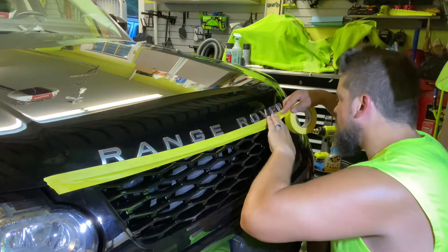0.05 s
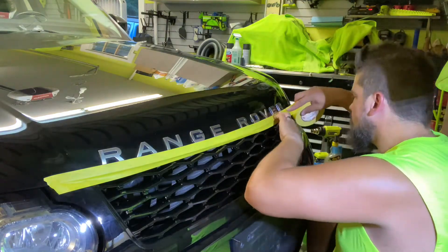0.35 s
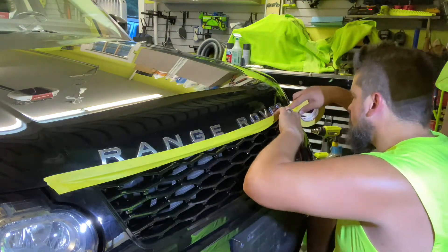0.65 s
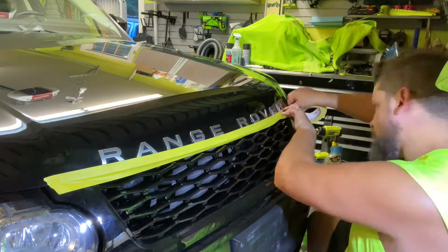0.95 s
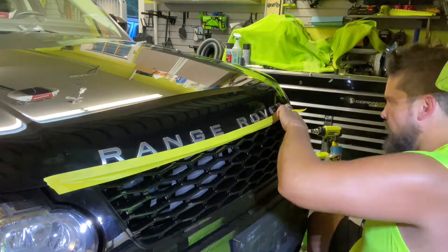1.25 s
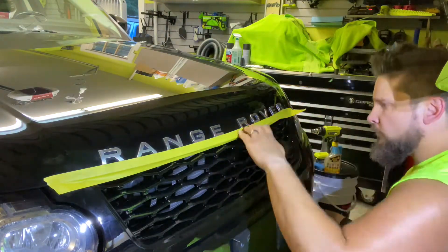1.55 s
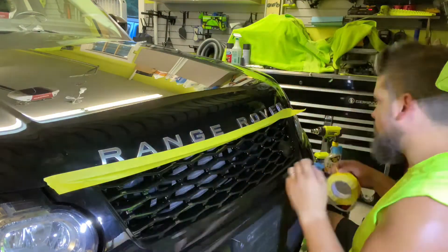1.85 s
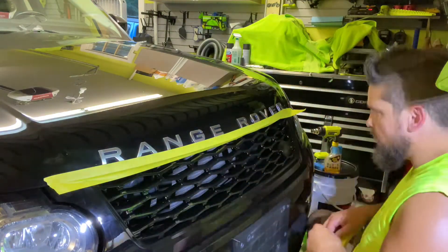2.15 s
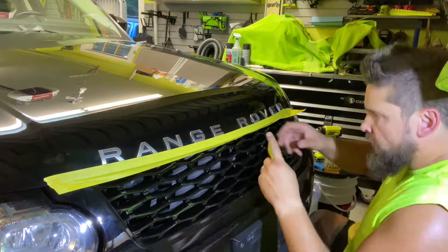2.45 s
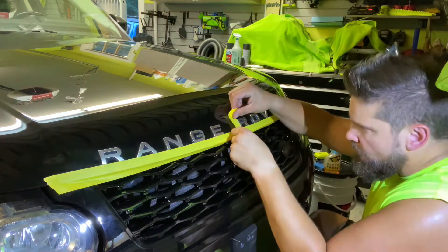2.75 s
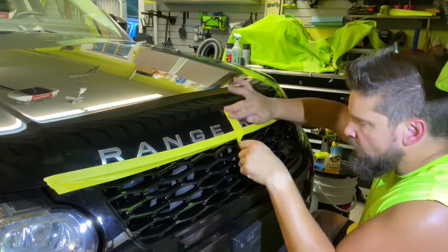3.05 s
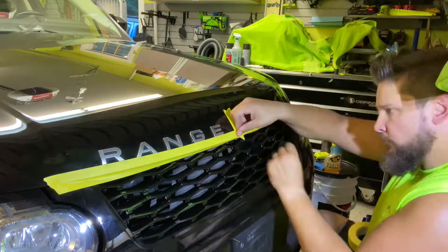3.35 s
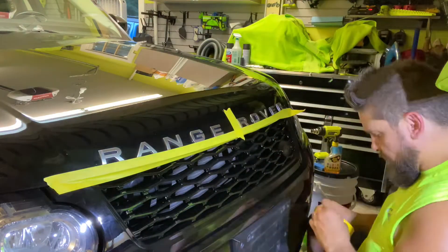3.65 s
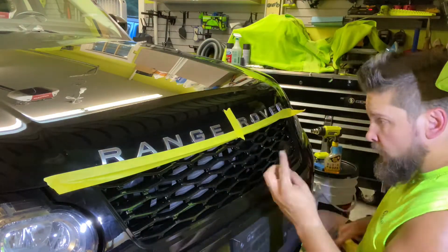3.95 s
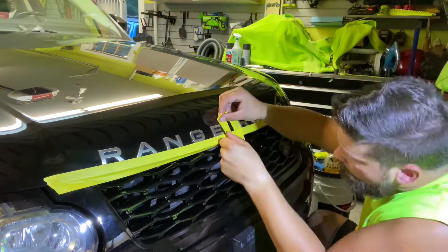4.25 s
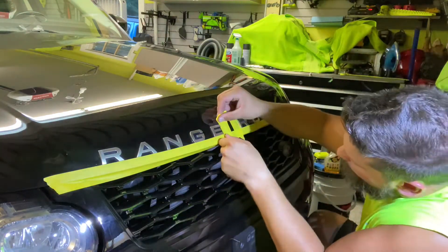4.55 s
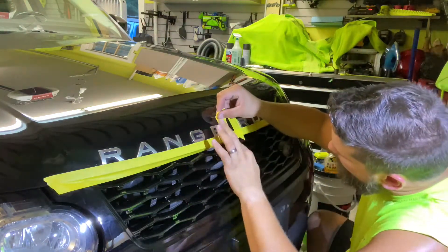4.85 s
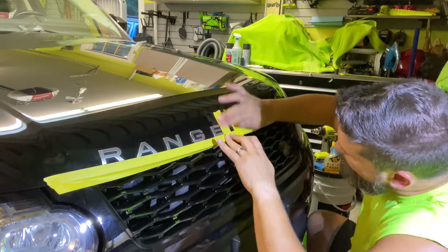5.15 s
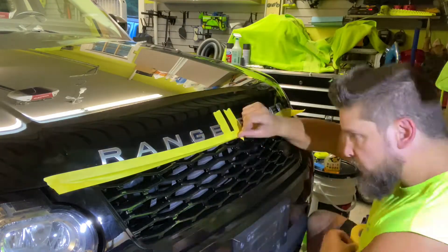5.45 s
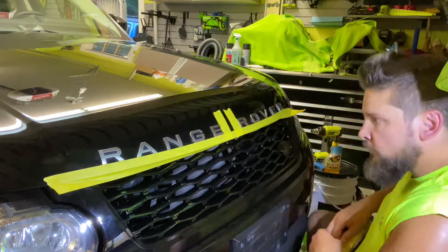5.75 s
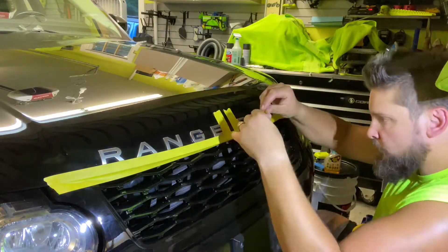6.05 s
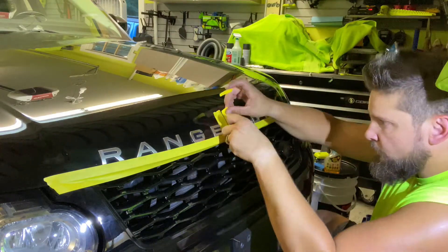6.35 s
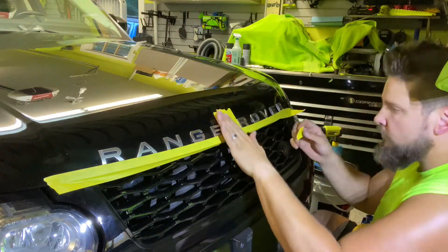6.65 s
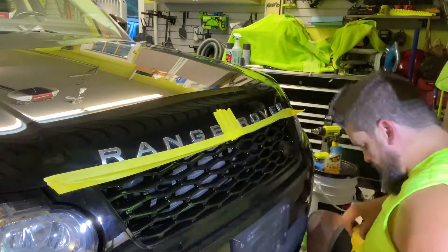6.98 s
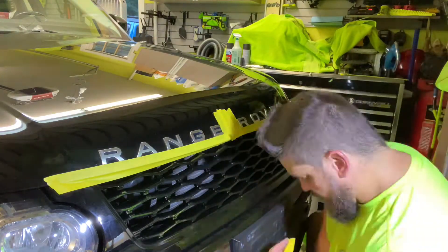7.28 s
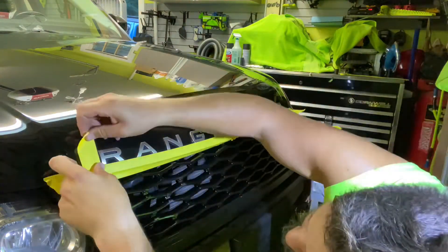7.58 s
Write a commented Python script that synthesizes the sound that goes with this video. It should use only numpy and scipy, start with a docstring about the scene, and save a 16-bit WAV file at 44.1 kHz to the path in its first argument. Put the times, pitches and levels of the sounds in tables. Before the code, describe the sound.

Masking tape crackles, squeaks and snaps as it is peeled, torn and pressed onto a car bonnet, over a faint fan hum.

```python
"""Masking tape is peeled off its roll, torn into short strips and pressed onto a car's painted bonnet.
Stick-slip friction drives it: the glue loads and lets go in crackling slips or, when the cycle is
nearly periodic, in short squeals. Fingers pat, rub and squeak on the strips.
The bonnet and the garage's shelves throw back quick echoes, over the steady hum and air of a fan."""
import sys
import numpy as np
from scipy import signal
from scipy.fft import rfft, irfft, next_fast_len
from scipy.io import wavfile

SR = 44100
rng = np.random.default_rng(int(sys.argv[2]) if len(sys.argv) > 2 else 0)


def master_out(mix):
    """Clip the mix to full scale and print it as 16-bit PCM to the path in sys.argv[1]."""
    frames = np.transpose(np.atleast_2d(mix))
    ceiling = np.clip(frames, -1, 1)
    pcm = np.round(ceiling * 32767).astype(np.int16)
    wavfile.write(sys.argv[1], SR, pcm)


N = 336042
TIME = np.arange(N) / SR
FILTER_HZ = np.fft.rfftfreq(2048, 1 / SR)
BAND_LIMIT_HZ = 15800


def gain_of(db):
    """Amplitude ratio of a level in decibels."""
    return 10 ** (np.asarray(db) / 20)


def unit_rms(x):
    """Normalisation to rms 1."""
    return x / np.sqrt(np.mean(x ** 2) + 1e-20)


def curve(points, hz):
    """Interpolation along a log-frequency axis."""
    f, value = np.transpose(points)
    return np.interp(np.log(hz + 1), np.log(f + 1), value)


def bells(peaks, hz):
    """Response in dB of a set of bell-shaped peaks and dips."""
    return sum(db * np.exp(-(2 * (hz - f) / width) ** 2) for f, width, db in peaks)


def add(mix, start_s, sound, pan_db=0):
    """Superposition in stereo; pan_db is the level difference, left minus right."""
    part = mix[:, max(round(start_s * SR), 0):][:, :len(sound)]
    part += gain_of([[pan_db / 2], [-pan_db / 2]]) * sound[:part.shape[1]]


def wander(count, hz):
    """Random modulation: noise of rms about 1, low-passed at hz."""
    size = next_fast_len(count + 4096)
    lowpass = np.exp(-(np.fft.rfftfreq(size, 1 / SR) / hz) ** 2)
    return unit_rms(irfft(rfft(rng.standard_normal(size)) * lowpass, size))[:count]


def colour(x, db):
    """Minimum-phase filter with gain db on FILTER_HZ: clicks keep their sharp front."""
    log_gain = np.log(gain_of(np.r_[db, db[-2:0:-1]]))
    taps = np.fft.ifft(np.exp(np.conj(signal.hilbert(log_gain)))).real
    return signal.fftconvolve(x, taps[:len(db)])


# Likeness of left and right: frequency_hz, correlation
STEREO_CORRELATION = [(40, 0.52), (150, 0.53), (300, 0.97), (1000, 0.83774), (2500, 0.55), (5000, 0.29),
                      (8500, -0.24), (16000, 0.3)]
def microphone_pair(pair):
    """Partial coherence: two independent signals become alike in the bass, less so in the treble."""
    size = pair.shape[1]
    a, b = rfft(pair)
    correlation = curve(STEREO_CORRELATION, np.fft.rfftfreq(size, 1 / SR))
    mid, side = a * np.sqrt((1 + correlation) / 2), b * np.sqrt((1 - correlation) / 2)
    return irfft(np.array([mid + side, mid - side]), size)


# Spectrum of the fan's air: frequency_hz, gain_db
AIR_SPECTRUM = [(35, -54), (100, -46), (170, -43), (290, -23), (410, -19), (470, -8.5), (517, 0),
                (630, -9.5), (1050, -7.5), (1350, -16.5), (2500, -16), (3700, -17.5), (4300, -20),
                (9000, -21), (16000, -28.5)]
# Resonances in that air: centre_hz, width_hz, gain_db
AIR_RESONANCES = [(815, 88, 0.5), (1466.6, 38, 9), (1922.9, 130, 8), (2180, 150, 4.5), (2440, 130, 3.5),
                  (3064, 90, 8), (3220, 120, 4), (3603, 170, 6.5), (3780, 90, 1), (4590, 110, 4.5),
                  (5830, 170, 7), (6670, 220, 4.5), (15000, 650, 7.5)]
# Hum, blade tone first (its level follows BLADE_SWELL instead): pitch_hz, level_db
HUM_TONES = [(516.8, -61), (1034, -67), (1098, -71.5), (1200, -77)]
# Swell of the blade tone: time_s, level_db
BLADE_SWELL = [(0, -62), (.5, -66), (.85, -60), (1.6, -60.5), (2.2, -55.5), (3.2, -58), (3.9, -63.5),
               (4.35, -59), (4.8, -65), (5.6, -54), (6.4, -64), (7.62, -56)]
def fan(air_db=-55.5, flutter_db=1.12, hum_trim_db=-2, waver=0.5):
    """Broadband air noise plus tones that waver in amplitude and phase; the blade tone swells."""
    hz = np.fft.rfftfreq(N, 1 / SR)
    spectrum = rfft(microphone_pair(rng.standard_normal((2, N))))
    spectrum *= gain_of(curve(AIR_SPECTRUM, hz) + bells(AIR_RESONANCES, hz))
    air = irfft(spectrum, N) / irfft(spectrum * (hz > 600), N).std()  # air_db is the level above 600 Hz
    air *= gain_of(air_db + flutter_db * wander(N, 28))
    blade_db = np.interp(TIME, *np.transpose(BLADE_SWELL))
    hum = np.zeros(N)
    for k, (pitch_hz, db) in enumerate(HUM_TONES):
        modulation = 1 + waver * (wander(N, 23) + 1j * wander(N, 11))
        tone = unit_rms((modulation * np.exp(2j * np.pi * pitch_hz * TIME)).real)
        hum += tone * gain_of((blade_db if k == 0 else db) + hum_trim_db)
    return air + hum


# Fixed peaks and dips that colour the tape sounds, with a bright edge near 7.8 kHz:
# centre_hz, width_hz, gain_db
TIMBRE_PEAKS = [(640.7, 83, 10.5), (2099, 175, 7), (2524, 126, 4), (2836, 220, 7.5), (3880, 500, 6),
                (4230, 410, 1.5), (4720, 140, 4.5), (5450, 120, 5), (7780, 200, 5.5), (9300, 170, -7),
                (12060, 910, 4)]
def timbre_db(hz):
    """Spectral colouring: one fixed response shared by strokes, slips and squeaks."""
    return bells(TIMBRE_PEAKS, hz)


def crackle(count, per_s, spread_db, fizz):
    """Shot noise: glue threads snap one by one, most small and a few large, over a fine fizz."""
    size = gain_of(spread_db * np.minimum(rng.exponential(1, count), 3))
    snaps = (rng.random(count) < per_s / SR) * size * rng.choice([-1, 1], count)
    return unit_rms(snaps + fizz * rng.standard_normal(count))


# Spectra of the panel's boom, the paper's rasp and the glue's sheen: frequency_hz, gain_db
PANEL_BOOM = [(60, -37), (170, -35.5), (320, -20), (480, -5), (650, -0.5), (1200, 0), (1900, -9.5),
              (4000, -42.5)]
PAPER_RASP = [(200, -47), (1100, -25.5), (2100, 4), (3300, -3), (5800, -2.5), (8000, -5.5), (14000, -30)]
GLUE_SHEEN = [(1000, -41), (5000, -8.5), (7800, -2), (9800, -5), (11000, -10.5), (16000, -12)]
# Tape or fingers drawn along: start_s, length_s, level_db, swell_db, catch_hz, grip, boom_db, sheen_db
SLIDING_STROKES = [(0.066, 0.084, -55, 0, 123, 0.75, -1, -13), (.325, 0.037, -53, 0, 110, 0.7, -6, -12),
                   (0.672, 0.3, -60, -2.5, 21, 0.84, -0.5, -3.5),
                   (1.133, .095, -52, -3, 92.2, 0.87, -14, 11),
                   (1.506, 0.064, -41.5, -10, 77, 0.56, -19, -8),
                   (1.718, 0.05731, -58, 4, 123, 0.81, -2.5, -1), (2.971, 0.16, -54, 2.5, 98, 0.82, 4, 0),
                   (4.917, 0.053, -42.5, 0, 110, 0.55, -16, -1.5), (5.131, .092, -53, 0, 122, 0.93, 1, 3.5),
                   (6.441, 0.16, -57.5, -1, 35, 1, -6, -5), (6.649, .158, -53.5, 2, 58, 0.63, -5.5, -8),
                   (7.146, 0.074, -52.5, -10, 110, 0.8, 0, 5)]
def strokes(mix, attack_s=0.0044, release_s=0.0069, jitter=0.082):
    """Sliding friction: each catch interrupts the crackle; more grip gives a deeper stutter."""
    for start_s, length_s, db, swell_db, catch_hz, grip, boom_db, sheen_db in SLIDING_STROKES:
        t = np.arange(0, length_s, 1 / SR)
        cycles = np.cumsum(catch_hz * (1 + jitter * wander(len(t), 86))) / SR
        catches = 1 + grip * (np.exp(-4 * (cycles % 1)) - 1)
        ends = np.minimum(t / attack_s, 1) * np.minimum((length_s - t) / release_s, 1)
        envelope = ends * gain_of(db + swell_db * (t / length_s - .5))
        for spectrum, voice_db in (PANEL_BOOM, boom_db), (PAPER_RASP, 0), (GLUE_SHEEN, sheen_db):
            grain = catches * crackle(len(t), per_s=3500, spread_db=2.5, fizz=0.19)
            voice = colour(grain, curve(spectrum, FILTER_HZ) + timbre_db(FILTER_HZ))[:len(t)]
            add(mix, start_s, gain_of(voice_db) * envelope * unit_rms(voice), pan_db=0.6)


# Spectrum of crackling tape: frequency_hz, gain_db
TAPE_SPECTRUM = [(30, -35.5), (150, -43.5), (300, -29.5), (450, -12), (620, -5), (1000, -5.5), (1450, -8),
                 (2100, -4), (4000, -6.5), (8000, -8), (11000, -14.5), (16000, -17.5)]
def strip_db(emphasis_hz, boom_db, treble_db, emphasis_db=6, width_octaves=0.49):
    """Spectral envelope of a crackle: a broad emphasis, weighted panel boom and the glue's crispness."""
    bell = np.exp(-(np.log2((FILTER_HZ + 1) / emphasis_hz) / width_octaves) ** 2)
    emphasis = emphasis_db * min(emphasis_hz / 2000, 1) * bell  # weaker when low
    boom = boom_db * curve([(200, 0.27), (550, 0.83), (1000, 0.73), (1800, 0.034)], FILTER_HZ)
    crisp = treble_db * curve([(4000, 0.079), (13000, 0.98)], FILTER_HZ)
    return curve(TAPE_SPECTRUM, FILTER_HZ) + timbre_db(FILTER_HZ) + emphasis + boom + crisp


def slip(mix, start_s, length_s, db, response_db, pan_db, lead_s=.0012, ripple_hz=420):
    """Stress relaxation: a burst gathers and fades with the tension; creases colour each one anew."""
    t = np.arange(-4 * lead_s, length_s, 1 / SR)
    rise = gain_of(-3) * np.exp(t / min(lead_s, length_s / 4))
    fall = np.exp(-0.8428 * t / length_s)
    burst = np.where(t < 0, rise, fall) * crackle(len(t), per_s=5000, spread_db=3.5, fizz=0.49)
    burst = unit_rms(burst) * np.sqrt(length_s * SR / len(t))
    creases = np.interp(FILTER_HZ / ripple_hz, np.arange(128), rng.uniform(-0.84, 1, 128))
    ripple_db = creases * curve([(800, 0), (2500, 5.31)], FILTER_HZ)
    add(mix, start_s + t[0], gain_of(db) * colour(burst, response_db + ripple_db), pan_db)


# The glue gives way under a tug: start_s, length_s, level_db, emphasis_hz, boom_db, treble_db
GLUE_SLIPS = [(.16, 0.0038, -25, 670, 2, 5.5), (.196, 0.00646, -33.5, 2600, 4, 2),
              (.22, .007, -37.5, 700, 19.5, 15.5), (0.232, 0.0081, -21, 12700, -8, -4.5),
              (.396, 0.0052, -39, 5100, 9.5, 0), (0.543, 0.0063, -28, 6387, -10, -9),
              (0.557, 0.017, -29, 6430, -3, -12), (0.597, 0.0061, -34, 7700, -12, -19),
              (0.781, 0.0027, -41, 6500, 4, 6.5), (.873, .005, -45, 6300, 3, -1),
              (.99, 0.0062, -31.5, 2160, 8.5, 12.5), (1.068, 0.014, -32.5, 7700, 7, -9.5),
              (1.316, 0.0039, -22, 6300, -15, 3), (1.331, 0.0048, -14, 4750, -29, 7),
              (1.346, 0.0074, -31, 4800, -3, -1), (1.592, 0.0075, -33, 3500, -14, 8),
              (1.607, 0.0087, -33.5, 3836, -16, 11), (1.694, 0.0075, -37.5, 2100, 6, 0.5),
              (1.782, 0.0077, -38.5, 860, 3, -1.5), (3.33, .008, -38, 6890, 4, 0),
              (4.574, .006, -44, 2200, -6, 2), (4.705, .01, -40.5, 3200, -2, 1),
              (4.992, 0.013, -31, 630, 1, -1), (5.01, 0.024, -33.5, 2400, 3, 5.5),
              (5.061, 0.02, -33, 670, 1, -2), (5.107, .007, -29, 630, 5, -2),
              (5.121, 0.012, -34, 2000, 2, 3.5), (6.09, 0.0031, -44.5, 12000, 11, 6),
              (6.502, 0.0055, -39, 4000, 2, -3), (6.725, 0.0042, -31, 8750, -3, 4),
              (7.17, 0.0095, -35, 7700, 9, 0), (7.1832, 0.0033, -23, 4400, -18, 10),
              (7.2255, 0.0029, -18, 7700, -2, 3), (7.301, .004, -30, 4800, -7, 2),
              (7.31, 0.0029, -33, 8050, -13, 6), (7.327, .0011, -17, 4770, -1, 1.5)]
def glue_slips(mix, trim_db=-1):
    """Impulse excitation: each tug frees a crackle with a broad emphasis around one frequency."""
    for start_s, length_s, db, emphasis_hz, boom_db, treble_db in GLUE_SLIPS:
        slip(mix, start_s, length_s, db + trim_db, strip_db(emphasis_hz, boom_db, treble_db), pan_db=1.1)


# Dull from a hand on the panel, sharp from the taut strip parting: start_s, level_db, pitch_hz, t60_s
KNOCK_MODES = [(.218, -42, 660, .04), (1.3327, -12, 4480, .016), (5.052, -33, 1150, .02),
               (7.1835, -19, 7700, .009), (7.255, -36.5, 660, .05), (7.327, -15, 4500, .008)]
def knocks(mix):
    """Damped free vibration: one mode builds over its first cycle and decays exponentially."""
    t = np.arange(SR // 8) / SR
    for start_s, db, pitch_hz, t60_s in KNOCK_MODES:
        envelope = gain_of(db - 60 * t / t60_s) * (1 - np.exp(-t * pitch_hz))
        add(mix, start_s, envelope * np.sin(2 * np.pi * pitch_hz * t))


# A fingertip pats the tape onto the panel: start_s, level_db, emphasis_hz, boom_db
FINGER_PATS = [(.73, -34.5, 1120, 11.5), (2.925, -45, 2200, 21), (2.959, -44, 1460, 23),
               (3.247, -34, 1070, 9), (3.266, -42.5, 2100, 15), (4.299, -44.5, 2600, 7),
               (5.052, -34, 1300, 23.5), (5.252, -30, 1400, 8.5)]
def pats(mix, trim_db=-1, length_s=.005, treble_db=-16):
    """Soft impact: a yielding fingertip gives much boom and little treble."""
    for start_s, db, emphasis_hz, boom_db in FINGER_PATS:
        slip(mix, start_s, length_s, db + trim_db, strip_db(emphasis_hz, boom_db, treble_db), pan_db=1.5)


def stick_slip(hz, db_per_octave, roughness, jitter=0.062, shimmer=0.69, rasp=0.9):
    """Relaxation oscillation of grip and release; roughness shakes cycle and harmonics and adds rasp."""
    count = len(hz)
    cycles = np.cumsum(hz * (1 + jitter * roughness * wander(count, 1180))) / SR
    k = np.arange(1, 9)[:, None]
    paper_db = -9 * curve([(8500, 0.057), (12000, 0.94)], k * hz)  # paper radiates the top poorly
    harmonics = gain_of(db_per_octave * np.log2(k) + timbre_db(k * hz) + paper_db)
    harmonics *= np.clip((BAND_LIMIT_HZ - k * hz) / 2200, 0, 1)
    harmonics *= 1 + shimmer * roughness * np.array([wander(count, 210) for _ in k])
    tone = (harmonics * np.sin(2 * np.pi * k * cycles)).sum(0)
    return unit_rms(unit_rms(tone) + rasp * roughness * friction_noise(cycles))


# Spectrum of the rasp in a squeak: frequency_hz, gain_db
SQUEAK_RASP = [(100, -59), (500, -18), (1400, -14), (2200, -4.5), (4500, -0.5), (8000, 5), (10500, -7),
               (16000, -17)]
def friction_noise(cycles):
    """Amplitude-modulated noise: one puff in each stick-slip cycle."""
    puffs = rng.standard_normal(len(cycles)) * (1 + np.cos(2 * np.pi * cycles))
    return unit_rms(colour(puffs, curve(SQUEAK_RASP, FILTER_HZ) + timbre_db(FILTER_HZ))[:len(cycles)])


# Glue leaving the roll; a fingertip smoothing tape: start_s, length_s, level_db, pitch_hz, glide_octaves
PEELING_SQUEAKS = [(1.128, 0.023, -41.5, 3469, .1), (1.142, .0055, -22, 7660, 0.14),
                   (1.159, .013, -33.5, 3084, -0.14), (1.179, 0.0094, -30.5, 7250, 0.62),
                   (1.193, 0.0057, -28.5, 7470, 0.42), (1.206, .019, -35.5, 5940, -0.25),
                   (1.221, .014, -40, 2720, -0.34), (1.242, 0.0079, -29.5, 2000, -0.17),
                   (1.256, .0092, -25.5, 2180, -0.22)]
SMOOTHING_SQUEAKS = [(1.59, 0.023, -36.5, 3580, 0.22), (1.625, 0.0036, -35, 3900, -0.16),
                     (4.91, 0.0084, -40.5, 6100, .1), (6.587, 0.0091, -36.5, 2664, .3),
                     (6.637, 0.012, -32, 2497, -0.26), (6.682, .012, -31, 2593, 0.38),
                     (6.73, 0.011, -26.5, 2793, .05), (6.742, 0.0085, -46.5, 2720, 0.06),
                     (6.775, 0.0078, -40, 2500, -.2)]
def squeaks(mix, rows, roughness, trim_db, db_per_octave, arch_octaves, pan_db):
    """Brief stick-slip oscillations whose pitch glides and arches with the speed of the pull."""
    for start_s, length_s, db, pitch_hz, glide_octaves in rows:
        position = np.linspace(-.5, .5, round(length_s * SR))
        octaves = glide_octaves * position - arch_octaves * (2 * position) ** 2
        tone = stick_slip(pitch_hz * 2 ** octaves, db_per_octave, roughness)
        tone *= signal.windows.tukey(len(tone), .7)
        add(mix, start_s, gain_of(db + trim_db) * unit_rms(tone), pan_db)


# A hard pull off the roll; a fresh strip laid gently: time_s, pitch_hz, level_db
PULL_SQUEAL = [(1.266, 2050, -32), (1.272, 2200, -19), (1.277, 2850, -23), (1.283, 2700, -21),
               (1.290, 2000, -22), (1.298, 1950, -21), (1.301, 2050, -35)]
PLACING_SQUEAL = [(2.453, 1750, -50), (2.461, 1950, -35), (2.472, 1430, -41), (2.487, 1100, -44),
                  (2.499, 1020, -51)]
def squeal(mix, contour, roughness, trim_db, db_per_octave, pan_db):
    """Sustained stick-slip oscillation that follows a contour of pitch and level."""
    time_s, pitch_hz, db = np.transpose(contour)
    t = np.arange(time_s[0], time_s[-1], 1 / SR)
    tone = stick_slip(np.interp(t, time_s, pitch_hz), db_per_octave, roughness)
    envelope = gain_of(np.interp(t, time_s, db) + trim_db) * signal.windows.tukey(len(t), .06)
    add(mix, time_s[0], envelope * tone, pan_db)


def thumb_rub(mix, start_s=1.4265, count=9, rate_hz=53, quickening_hz=1.15, slip_s=0.0062):
    """Slow stick-slip: the thumb judders along the strip, harder and quicker as it goes."""
    response_db = strip_db(emphasis_hz=2633, boom_db=-11.5, treble_db=-1.5, emphasis_db=-1.5)
    for k, (late, loud) in enumerate(rng.standard_normal((count, 2))):
        onset_s = start_s + k / (rate_hz + quickening_hz * k) + 0.00045 * late
        db = np.interp(k, [0, count - 1], [-29.5, -24]) + 1.5 * loud
        slip(mix, onset_s, slip_s, db, response_db, pan_db=1.5)


# A short strip is torn off the roll, on the right: start_s, length_s, level_db
STRIP_TEARS = [(2.034, 0.0067, -49), (2.052, 0.014, -44), (3.778, .015, -45.5), (5.67, .014, -37),
               (7.103, 0.013, -38.5)]
def tears(mix, count=3, trim_db=-4, swell_db=9, first_hz=12000, last_hz=4200):
    """Fracture of paper fibres, away from the panel: fuller and louder as the rip crosses the strip."""
    for start_s, length_s, db in STRIP_TEARS:
        step_s = length_s / count
        for k, progress in enumerate(np.linspace(0, 1, count)):
            emphasis_hz = first_hz * (last_hz / first_hz) ** progress
            response_db = strip_db(emphasis_hz, boom_db=-11, treble_db=23 - 11 * progress)
            step_db = db + trim_db + swell_db * (progress - .5)
            slip(mix, start_s + k * step_s, step_s, step_db, response_db, pan_db=-1)


# Spectrum of a fresh strip sliding through the fingers: frequency_hz, gain_db
SWISH_SPECTRUM = [(1500, -32), (3000, -1), (5000, -16), (5900, 0), (7200, -6), (8400, 2.5), (10700, -15),
                  (13000, -1), (14300, -15), (16000, -17)]
def swish(mix, start_s=2.447, length_s=0.2, level_db=-51, fade_db_per_s=68, attack_s=.012, release_s=.05):
    """Smooth sliding friction: a hiss that dies away as the hand slows."""
    t = np.arange(0, length_s, 1 / SR)
    hiss = unit_rms(colour(rng.standard_normal(len(t)), curve(SWISH_SPECTRUM, FILTER_HZ))[:len(t)])
    ends = np.minimum(t / attack_s, 1) * np.minimum((length_s - t) / release_s, 1)
    add(mix, start_s, ends * gain_of(level_db - fade_db_per_s * t) * hiss, pan_db=-3)


def finger_ticks(mix, count=12, level_db=-57, uneven_db=3, length_s=0.0026):
    """Adhesion: the sticky strip ticks faintly on the fingers at random moments."""
    response_db = strip_db(emphasis_hz=7000, boom_db=-3, treble_db=12.5)
    for when, loud, side in rng.uniform(-1, 1, (count, 3)):
        start_s = TIME[-1] * (when + 1) / 2
        slip(mix, start_s, length_s, level_db + uneven_db * loud, response_db, pan_db=3 * side)


def echoes(x, delay_s, t60_s, level_db, per_s=6000):
    """Reverberation: random reflections begin after a delay and decay exponentially."""
    t = np.arange(SR // 2) / SR
    taps = rng.standard_normal((2, len(t))) * (rng.random((2, len(t))) < per_s / SR)
    taps = microphone_pair(taps) * (t > delay_s) * gain_of(-60 * t / t60_s)
    taps *= gain_of(level_db) / np.linalg.norm(taps, axis=1, keepdims=True)
    return signal.fftconvolve(x, taps, axes=1)[:, :N]


def near_echoes(x, count=6, crossfade_s=.035):
    """Early reflections: the pattern keeps changing as the hands and the strip move."""
    out = np.zeros((2, N))
    for k in range(count):
        share = np.maximum(1 - abs((TIME / crossfade_s - k) % count - 1), 0)
        out += echoes(x * np.sqrt(share), delay_s=0.00066, t60_s=0.045, level_db=-3)
    return out


def scene():
    """Superposition of the direct tape sounds, their early echoes, the garage's faint tail and the fan."""
    tape = np.zeros((2, N))
    for source in glue_slips, tears, pats, thumb_rub, strokes, swish, knocks, finger_ticks:
        source(tape)
    squeaks(tape, PEELING_SQUEAKS, roughness=.39, trim_db=-1.5, db_per_octave=-5.5,
            arch_octaves=0.035, pan_db=1.8)
    squeaks(tape, SMOOTHING_SQUEAKS, roughness=.27, trim_db=-1, db_per_octave=-13.5,
            arch_octaves=0.1, pan_db=3.5)
    squeal(tape, PULL_SQUEAL, roughness=.39, trim_db=-2, db_per_octave=-3.5, pan_db=1.5)
    squeal(tape, PLACING_SQUEAL, roughness=.15, trim_db=0, db_per_octave=-21, pan_db=0)
    garage = echoes(tape, delay_s=0.015, t60_s=0.23, level_db=-20.5)
    return tape + near_echoes(tape) + garage + fan()


def record(dry):
    """Band limiting by a linear-phase low-pass filter."""
    lowpass = signal.firwin(401, BAND_LIMIT_HZ, window=("kaiser", 8), fs=SR)
    return signal.oaconvolve(dry, lowpass[None], "same")


dry = scene()
out = record(dry)
master_out(out)
```